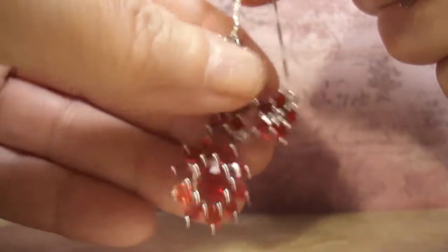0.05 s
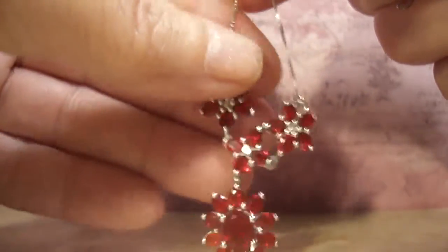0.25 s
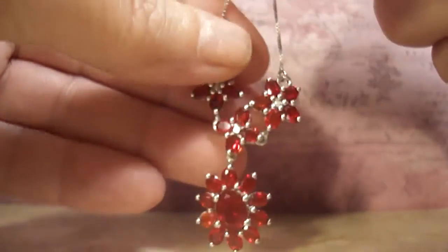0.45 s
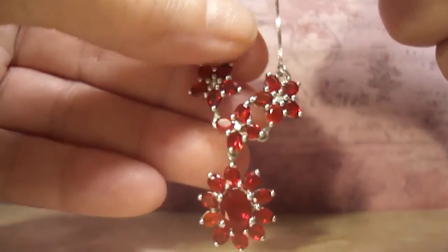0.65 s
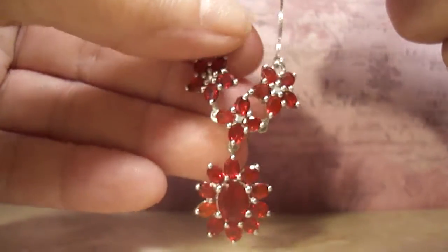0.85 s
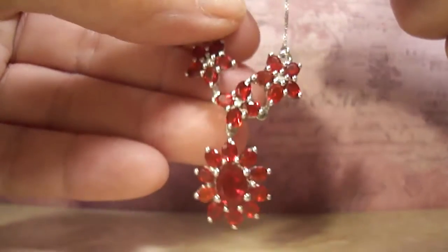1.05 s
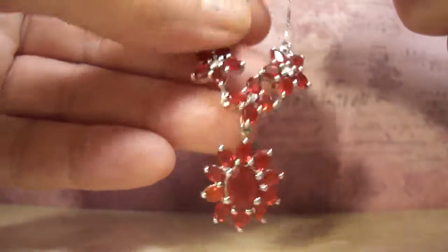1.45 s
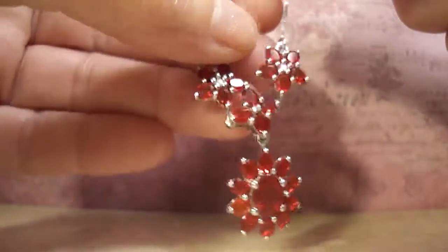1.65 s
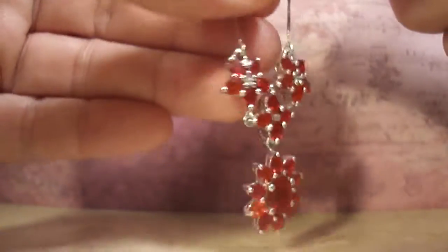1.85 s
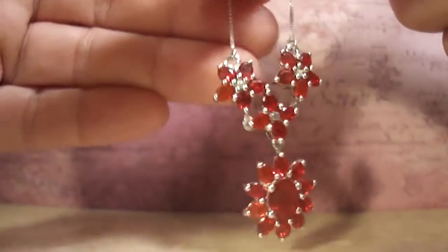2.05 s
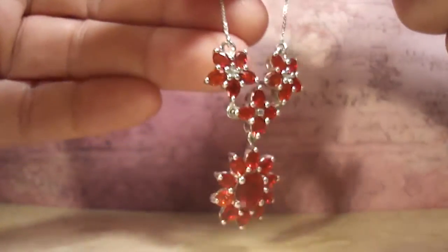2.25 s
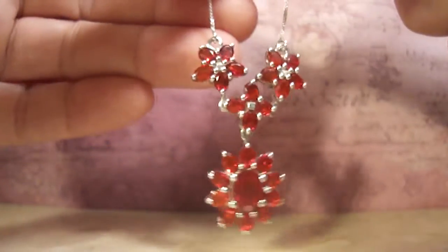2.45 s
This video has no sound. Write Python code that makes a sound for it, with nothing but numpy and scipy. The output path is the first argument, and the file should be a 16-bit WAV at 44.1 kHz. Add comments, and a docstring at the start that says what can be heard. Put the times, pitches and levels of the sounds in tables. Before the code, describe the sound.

One sharp click from a handled necklace pendant, then light chain ticks and soft rubbing.

```python
"""A metal necklace in the fingers

Close by in a small, quiet room, a pendant clacks once and rattles to rest, each impact exciting
its damped modes. Chain links tick, and skin rubs on the chain by stick-slip friction. Behind it are
room hiss, faint hums, a fan's whine, a thin whistle and the ticking of a camera's focus motor."""
import sys
import numpy as np
from scipy import signal
from scipy.fft import rfft, irfft
from scipy.io import wavfile

SR = 44100
rng = np.random.default_rng(int(sys.argv[2]) if len(sys.argv) > 2 else 0)


def bounce(signal):
    """Save signal as a 16-bit WAV file at the path given by the first command-line argument."""
    frames = np.transpose(np.atleast_2d(signal))
    limited = np.clip(frames, -1, 1)
    pcm = np.round(limited * 32767).astype(np.int16)
    wavfile.write(sys.argv[1], SR, pcm)


N = 114660


def undb(db):
    """Decibels to amplitude ratio."""
    return 10 ** (np.asarray(db) / 20)


def unit(x):
    """Normalisation to an rms of 1."""
    return x / np.sqrt(np.mean(x ** 2))


def response(colour, size=8192):
    """Minimum-phase filter: a folded cepstrum turns (Hz, dB) points into a unit-energy response."""
    hz, db = np.array(colour).T
    freqs = np.maximum(np.fft.rfftfreq(size, 1 / SR), 1)
    gain = undb(np.interp(np.log(freqs), np.log(hz), db))
    cepstrum = irfft(np.log(gain))
    cepstrum[1:size // 2] *= 2
    cepstrum[size // 2 + 1:] = 0
    impulse = irfft(np.exp(rfft(cepstrum)))
    return impulse / np.linalg.norm(impulse)


def through(x, impulse):
    """Linear filtering by convolution."""
    return signal.fftconvolve(x, impulse)[:N]


def add(out, start_s, x):
    """Superposition of a delayed sound."""
    i = int(max(start_s, 0) * SR)
    out[i:] += x[:N - i]


def fade(t60_s):
    """Exponential decay: 60 dB down after t60_s."""
    return np.exp(-np.log(1000) * np.arange(N) / SR / t60_s)


def burst(t60_s):
    """Exponentially damped noise of unit energy."""
    x = rng.standard_normal(N) * fade(t60_s)
    return x / np.linalg.norm(x)


def crack(t60_s, size=8192):
    """Broadband excitation: a short burst, whitened to cover all frequencies alike."""
    spectrum = rfft(burst(t60_s)[:size])
    flat = irfft(spectrum / np.abs(spectrum))[:size // 2]
    return np.pad(flat, (0, N - len(flat))) / np.linalg.norm(flat)


def ring(modes):
    """Free vibration: a sum of damped sines, neighbours starting in opposite directions."""
    t = np.arange(SR // 4) / SR
    x = sum((-1) ** k * undb(db) * fade(t60_s)[:len(t)] * np.sin(2 * np.pi * hz * t)
            for k, (hz, db, t60_s) in enumerate(modes))
    return np.pad(x, (0, N - len(x)))


def narrow(hz, width_hz):
    """Narrowband noise; centred on 0 Hz it is a slow random fluctuation."""
    detuning = 2 * (np.fft.rfftfreq(N, 1 / SR) - hz) / width_hz
    return unit(irfft(rfft(rng.standard_normal(N)) / (1 + detuning ** 2), N))


# Spectrum of the room hiss: frequency_hz, relative_db
HISS_COLOUR = [(15, -50), (25, -37), (87, -23.5), (115, -19.5), (272, -11.5), (325, -5.5), (379, -11.5),
               (409, -7.5), (453, -9), (855, -12), (946, -6), (1130, -12), (1390, -13), (2300, -21),
               (3930, -24), (5460, -27.5), (10800, -32), (14100, -81), (22000, -120)]
# Hum bands: pitch_hz, width_hz, level_db
HUMS = [(119.3, 5.2, -75.5), (166.3, 3.3, -71.5), (238, 16, -69.5), (418.6, 10.4, -63), (681, 50, -63.5),
        (962.6, 10.4, -59.5)]


def room_noise(hiss_db=-50, waver_db=.5):
    """Ambient noise floor: gently wavering broadband hiss under narrowband hums."""
    hiss = unit(signal.fftconvolve(rng.standard_normal(2 * N), response(HISS_COLOUR))[N:2 * N])
    hiss *= undb(hiss_db + waver_db * narrow(0, 1.6))
    return hiss + sum(undb(db) * narrow(hz, width_hz) for hz, width_hz, db in HUMS)


def fan_whine(pitch_hz=978, drift_hz=2, level_db=-54, waver_db=2.5):
    """Random modulation: the fan's tone wanders in frequency and amplitude."""
    phase = 2 * np.pi * np.cumsum(pitch_hz + drift_hz * narrow(0, 16.5)) / SR
    waver = undb(waver_db * narrow(0, 4.0))
    return undb(level_db) * unit(np.sin(phase) * waver)


def whistle(pitch_hz=7864, swing_hz=31.8, rate_hz=30, jitter_hz=6, level_db=-68):
    """Frequency modulation: a thin electronic tone trembles in pitch at a steady level."""
    t = np.arange(N) / SR
    hz = pitch_hz + swing_hz * np.sin(2 * np.pi * rate_hz * t) + jitter_hz * narrow(0, 38)
    return undb(level_db) * unit(np.sin(2 * np.pi * np.cumsum(hz) / SR))


# Spectrum of the wall reflections: frequency_hz, relative_db
ROOM_COLOUR = [(100, -10), (650, -6), (1400, 17), (3300, 0), (4600, 17), (7000, 7), (11000, 9.5)]


def reverberate(x, t60_s=.5, tail_db=-24, delay_s=.008):
    """Reverberation: a faint diffuse tail from the walls follows the direct sound."""
    tail = np.zeros(N)
    add(tail, delay_s, through(burst(t60_s), response(ROOM_COLOUR)))
    return x + undb(tail_db) * through(x, tail)


# Runs of the focus motor: start_s, end_s, level_db
MOTOR_RUNS = [(.04, .56, -39), (.75, 1.23, -35)]
# Its resonances: pitch_hz, relative_db, t60_s
MOTOR_MODES = [(4020, -2, .013), (6860, -4, .010)]


def focus_motor(step_hz=59.9, align_s=.7725, scatter_db=2):
    """Impulse-train excitation: each even step of the lens rings two modes in a new balance."""
    out = np.zeros(N)
    times = align_s % (1 / step_hz) + np.arange(int(N / SR * step_hz) - 1) / step_hz
    for hz, mode_db, t60_s in MOTOR_MODES:
        steps, tick = np.zeros(N), ring([(hz, 0, t60_s)])
        sizes = undb(scatter_db * rng.standard_normal(len(times)))
        for start_s, end_s, db in MOTOR_RUNS:
            running = (times > start_s) & (times < end_s)
            steps[(times[running] * SR).astype(int)] = undb(db) * sizes[running]
        out += undb(mode_db) * through(steps, tick / np.linalg.norm(tick))
    return out


def friction(strokes, colour, slips_per_s=2800, spread_db=3.5):
    """Stick-slip friction: dense random impulses with a Gaussian rise and exponential fall per stroke."""
    t = np.arange(N) / SR
    slips = (rng.random(N) < slips_per_s / SR) * rng.choice([-1, 1], N)
    slips = slips * undb(spread_db * rng.standard_normal(N))
    swell = np.zeros(N)
    for peak_s, rise_s, fall_s, db in strokes:
        lag = t - peak_s
        swell += undb(db) * np.exp(-np.where(lag < 0, .5 * (lag / rise_s) ** 2, lag / fall_s))
    return through(unit(slips) * swell, response(colour))


# Shifts of the hand: peak_s, rise_s, fall_s, level_db
GRIP_STROKES = [(1.595, .02, .03, -56)]
# Their spectrum: frequency_hz, relative_db
GRIP_COLOUR = [(40, -28), (80, -18), (125, 5), (200, -9), (330, 8), (600, -30), (2000, -28)]


def grip_shift():
    """Low-frequency friction: the hand shifts its grip with a dull rustle."""
    return friction(GRIP_STROKES, GRIP_COLOUR)


# Strokes of skin on the chain: peak_s, rise_s, fall_s, level_db
RUB_STROKES = [(.435, .015, .02, -58), (.648, .015, .025, -54), (.712, .018, .028, -52.5),
               (1.43, .02, .03, -59), (1.665, .008, .03, -56.5), (1.875, .02, .035, -56),
               (2.124, .008, .025, -53.5), (2.157, .007, .036, -49.8)]
# Their spectrum: frequency_hz, relative_db
RUB_COLOUR = [(500, -3), (1800, -10), (2500, 8), (3100, 1), (4300, 6), (5400, 0.5), (7100, 1), (8200, -9),
              (11000, -17)]


def skin_rub():
    """Stick-slip of skin on metal: short, soft rasps."""
    return friction(RUB_STROKES, RUB_COLOUR)


# Slides of the chain: peak_s, rise_s, fall_s, level_db
SLIDE_STROKES = [(.05, 0.17, 0.015, -59), (.164, 0.0071, 0.01, -60), (.435, 0.0062, 0.02, -55.5),
                 (.705, 0.012, 0.03, -61), (1.463, 0.013, 0.022, -55), (1.755, 0.089, 0.067, -63)]
# Link impacts: start_s, tick_db, ring_db
LINK_TICKS = [(0.0231, -22.5, -50), (0.025, -19, -55), (0.026, -22, -40), (0.0816, -30, -50),
              (0.159, -43, -48), (0.238, -23.5, -48), (.2932, -24, -51), (0.296, -29, -49),
              (0.3205, -25, -38.5), (0.3251, -30, -50), (.7380, -43, -54), (1.474, -31, -41),
              (1.66, -36, -65), (2.155, -32, -68)]
# Spectrum of ticks and slides: frequency_hz, relative_db
LINK_COLOUR = [(300, 0), (1800, -7), (2800, 3.5), (4500, -1), (6500, 7), (7800, 6), (10300, 9.5),
               (11500, -15)]
# Resonances of a link: pitch_hz, relative_db, t60_s
LINK_MODES = [(9700, 4, 0.0058), (10350, 9.2, 0.0055), (10880, 1, 0.006)]


def chain(tick_t60_s=.015):
    """Impact and friction of small bodies: links slide, snap into place and ring high and briefly."""
    ticks, rings, body = np.zeros(N), np.zeros(N), ring(LINK_MODES)
    for start_s, tick_db, ring_db in LINK_TICKS:
        add(ticks, start_s, undb(tick_db) * crack(tick_t60_s))
        add(rings, start_s, undb(ring_db) * body)
    return through(ticks, response(LINK_COLOUR)) + rings + friction(SLIDE_STROKES, LINK_COLOUR)


# Jostling of the pendant's settings: peak_s, rise_s, fall_s, level_db
JOSTLES = [(.219, .002, .008, -35.5), (.243, .008, .05, -45.5), (.322, .005, .008, -49)]
# Its spectrum: frequency_hz, relative_db
JOSTLE_COLOUR = [(200, -9), (650, 8), (1400, 5.5), (2200, -1.5), (2800, 10.5), (4600, -2), (5200, -2),
                 (7100, -5), (7700, -16), (11000, -15)]


def settings_jostle():
    """Dense micro-contacts: the settings jostle as the pendant comes to rest."""
    return friction(JOSTLES, JOSTLE_COLOUR)


# Resonances of the pendant: pitch_hz, relative_db, longest_t60_s
PENDANT_MODES = [(680, -7, 0.032), (1290, -2, 0.03), (2589, -6, 0.05), (2770, 0, 0.04), (3075, -6, .03),
                 (3400, -6, 0.03), (3660, -8, .02), (4045, 2.5, 0.044), (4320, -15, 0.1), (4690, -2, 0.022),
                 (4815, -6, .036), (5635, -8, 0.05), (6272, -1, 0.029), (7100, -1, 0.056),
                 (8092, -8.5, 0.035)]
# Its impacts: start_s, hit_db, ring_db, t60_ratio, cutoff_hz
KNOCKS = [(.1732, 7.3, -23, 1, 15000), (.2151, -11, -38, .8, 9000), (.2188, -15, -42, .8, 9000),
          (.2213, -17, -43, 1, 9000), (.2240, -20, -47, .8, 7000), (.2390, -22, -50, .5, 6000),
          (.2580, -24, -53, .4, 4500), (.2888, -21, -53, .3, 4000), (.2928, -13, -47, .3, 4200),
          (.2965, -22, -52, .3, 4000)]
# Spectrum of a hit: frequency_hz, relative_db
KNOCK_COLOUR = [(60, -30), (430, -21), (650, -9), (1050, -9.5), (1560, -1.8), (1950, -13), (2480, -13.5),
                (3050, 1), (3650, -3), (4250, -12), (4700, -6.5), (5100, -12), (6900, -9), (7600, -25),
                (9400, -21), (10250, -15.5), (11200, -26)]


def pendant(contact_gain_db=1.5, clatter_gain_db=-8.5):
    """Impact excitation of modes: damping by the fingers makes a knock duller and shorter."""
    out, colour = np.zeros(N), response(KNOCK_COLOUR)
    for start_s, hit_db, ring_db, t60_ratio, cutoff_hz in KNOCKS:
        contact = undb(contact_gain_db) * crack(t60_s=.007)
        clatter = undb(clatter_gain_db) * crack(t60_s=.03)  # of the settings
        body = ring([(hz, db, t60_s * t60_ratio) for hz, db, t60_s in PENDANT_MODES])
        knock = undb(hit_db) * through(contact + clatter, colour) + undb(ring_db) * body
        lowpass = signal.butter(4, cutoff_hz, fs=SR, output="sos")
        add(out, start_s, signal.sosfilt(lowpass, knock))
    return out


def scene():
    """Superposition in mono: only the necklace is given reverberation."""
    necklace = reverberate(pendant() + settings_jostle() + chain() + skin_rub())
    return (necklace + grip_shift() + focus_motor() + whistle() + room_noise() + fan_whine())[None]


def record(dry):
    """Band limiting: a steep elliptic low-pass cuts off the top of the treble."""
    cutoff_hz = 11050
    return signal.sosfilt(signal.ellip(10, .2, 70, cutoff_hz, fs=SR, output="sos"), dry)


dry = scene()
out = record(dry)
bounce(out)
```